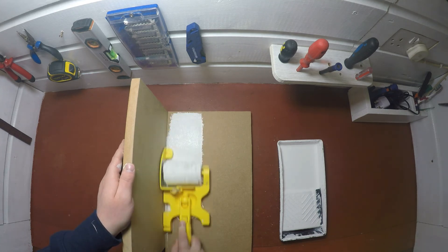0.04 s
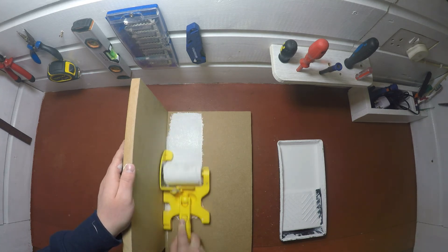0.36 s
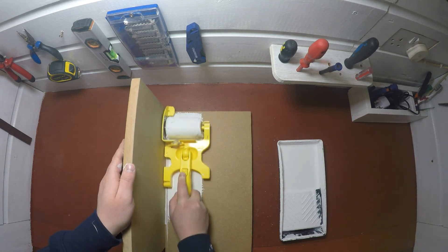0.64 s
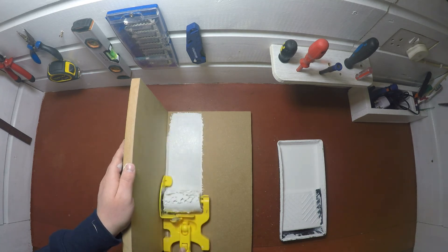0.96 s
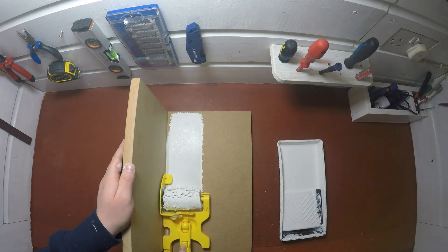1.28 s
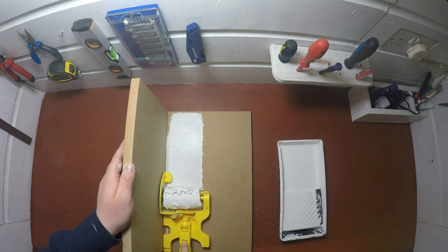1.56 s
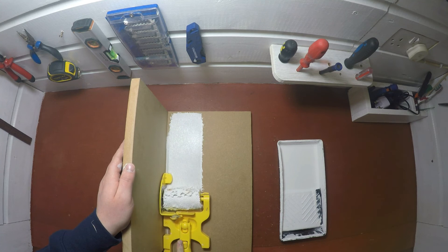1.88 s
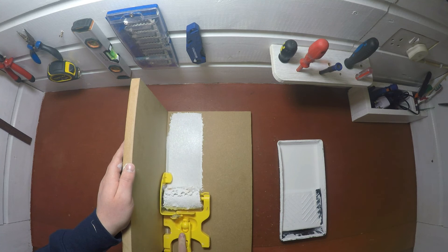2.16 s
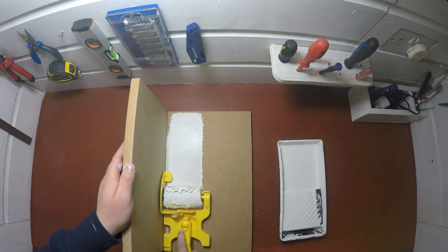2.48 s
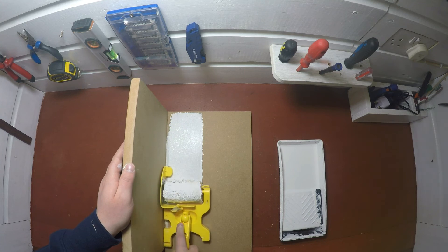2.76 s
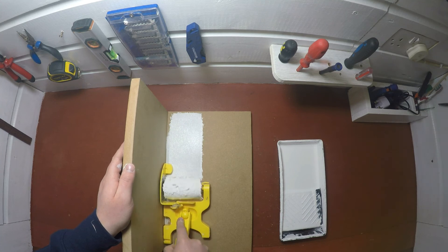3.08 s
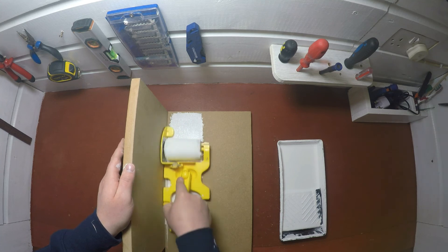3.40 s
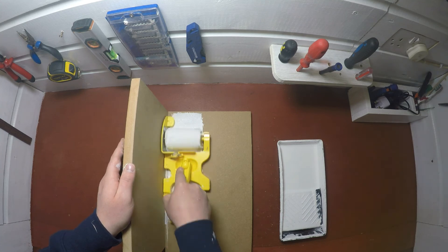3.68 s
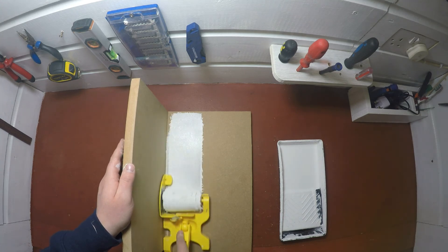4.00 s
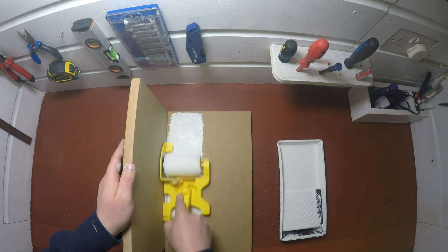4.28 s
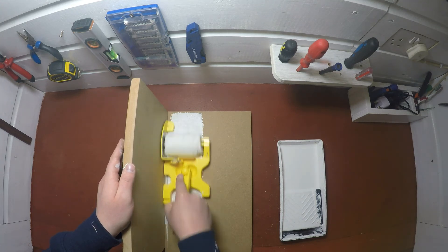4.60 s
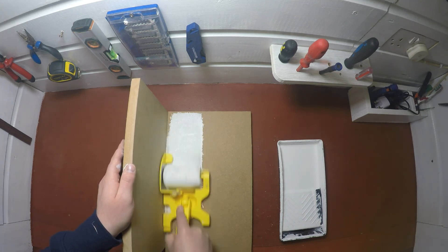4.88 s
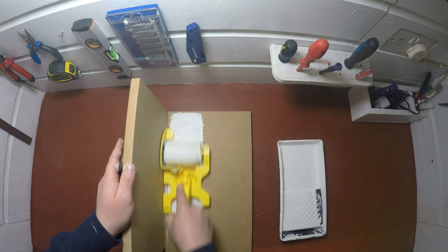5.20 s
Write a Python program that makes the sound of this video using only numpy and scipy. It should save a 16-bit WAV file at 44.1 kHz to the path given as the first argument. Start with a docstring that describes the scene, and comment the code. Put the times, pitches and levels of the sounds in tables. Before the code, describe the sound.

A small plastic paint roller runs over a board, close by, in a small, dry room. For the first second it makes three quick strokes: the nap rolls, the edge guide scrapes, wet paint crackles and the dry axle gives tiny squeaks, over a soft rumble from the workbench. From about 1.1 to 3.1 seconds the rolling nearly stops, leaving faint nudges, small plastic clicks and light knocks as the tool is handled. At about 2.4 seconds comes one hard snap with a low thump in the bench, then a softer bump near 2.8. Rolling resumes at about 3.1 seconds and continues to the end in around five strokes, growing slightly louder, with sticky crackle and occasional clicks. The guide chatters briefly and brightly around 4.4 seconds, and the axle squeaks again near 4.8. Faint room noise lies underneath.

```python
"""Paint roller on a workbench

A plastic roller with an edge guide runs back and forth over a board, close by, in a small, dry room.
Friction makes the guide scrape and the dry axle squeak; wet paint crackles off the nap, and the
rolling forces the bench to rumble. In a pause the frame is handled: small clicks, then one hard
snap whose impact thumps the bench."""
import sys
import numpy as np
from scipy import signal
from scipy.fft import rfft, irfft, next_fast_len
from scipy.io import wavfile
from scipy.ndimage import uniform_filter1d

SR = 44100
rng = np.random.default_rng(int(sys.argv[2]) if len(sys.argv) > 2 else 0)


def generate_wav(sig):
    """Save sig (samples, or channels by samples) to the path in sys.argv[1] as 16-bit PCM at SR."""
    pcm = np.round(np.clip(np.atleast_2d(sig).T, -1, 1) * 32767).astype(np.int16)
    wavfile.write(sys.argv[1], SR, pcm)


N = 231501
T = np.arange(N) / SR


# Passes and nudges of the roller:
# (start [s], fastest [s], end [s], tread level [dB], guide level [dB], paint level [dB])
STROKES = [(-.2, 0.132, 0.32, -38, -30.5, -45.5), (0.319, 0.501, 0.71, -36.5, -31, -42.5),
           (0.598, 0.872, 1.116, -39, -32, -46), (1.073, 1.18, 1.29, -65, -63.5, -65),
           (1.374, 1.493, 1.74, -61.5, -57, -63.5), (1.91, 2.04, 2.09, -64, -55.5, -69),
           (2.09, 2.15, 2.35, -56, -59, -68), (2.55, 2.739, 2.95, -58.5, -60, -60),
           (3.099, 3.426, 3.683, -41, -40.5, -47), (3.702, 3.888, 4.126, -39.5, -37, -46.5),
           (4.163, 4.437, 4.603, -36.5, -31.5, -45.5), (4.578, 4.773, 4.866, -35.5, -31.5, -41.5),
           (4.884, 5.029, 5.184, -34, -29.5, -42.5), (5.182, 5.285, 5.67, -35.5, -28.5, -43.5)]

def strokes():
    """Power laws: the amplitudes of tread, scrape and crackle each grow as a power of roller speed."""
    tread, guide, paint = undb([-73.5, -70, -73.5])  # roller at rest
    for start, fastest, end, tread_db, guide_db, paint_db in STROKES:
        progress = np.interp(T, [start, fastest, end], [0, .5, 1])
        speed = np.abs(np.sin(np.pi * progress))
        tread = np.hypot(tread, undb(tread_db) * speed ** 1.31)
        guide = np.hypot(guide, undb(guide_db) * speed ** 1.6)
        paint = np.hypot(paint, undb(paint_db) * speed ** .93)
    return tread, guide, paint


# Resonances of the board: (frequency [Hz], bandwidth [Hz], gain [dB])
BOARD_MODES = [(262, 37, 1), (319.4, 75, 7), (529, 34, 7), (603, 120, 9.5), (820, 260, 4), (1465, 78, 5),
               (1742, 89, 6.5), (2850, 98, -6.5), (3420, 110, 6), (3720, 77, 7.5), (4270, 230, 5),
               (5400, 300, 2.5)]
# Spectra of the nap's tread, the guide's scrape and the paint's crackle: (frequency [Hz], gain [dB])
TREAD_SPECTRUM = [(60, -25), (120, -3), (170, -2.5), (260, 2), (420, -1), (560, 0.5), (690, -7.5),
                  (850, -2), (1200, -9), (2200, -29), (8000, -60.5)]
SCRAPE_SPECTRUM = [(200, -35), (650, -19), (1050, -1.5), (1500, 3.5), (2200, -2.5), (3300, -5.5),
                   (4500, -13.5), (5600, -13), (6800, -20.5), (10000, -23.5), (15000, -31)]
PAINT_SPECTRUM = [(800, -14), (3000, 3.5), (6000, -1.5), (7500, -9), (9200, 0), (10600, -6.5), (12300, -3),
                  (15500, -16)]

def rolling(tread, guide, paint):
    """Shot noise: tiny impulses merge as the nap treads, the guide catches and paint threads snap."""
    spurts = walk(rate=50)
    contacts = grains(per_second=2500, spread_db=2.5) * undb(1.3 * spurts)
    catches = grains(per_second=3500, spread_db=0) * undb(2 * spurts)
    snaps = grains(per_second=4000, spread_db=-.5) * undb(2.85 * walk(rate=200))
    body = unit(colour(contacts, TREAD_SPECTRUM, BOARD_MODES))
    scrape = unit(colour(catches, SCRAPE_SPECTRUM, BOARD_MODES))
    crackle = unit(colour(snaps, PAINT_SPECTRUM))
    return tread * body + undb(.3) * guide * scrape + undb(-1.3) * paint * crackle


# Resonances of the plastic frame: (frequency [Hz], bandwidth [Hz], gain [dB])
FRAME_MODES = [(608, 13, 6.5), (1183, 76, 9), (1380, 70, 1.5), (1510, 79, 9), (2060, 43, -3),
               (2367, 120, 10), (3060, 330, 5), (3393, 140, 4.5), (4380, 180, 5), (5540, 420, 4.5),
               (6520, 270, 7.5), (9300, 390, 4)]
# Axle squeaks: (time [s], duration [s], start pitch [Hz], end pitch [Hz], relative level [dB],
# overtones re fundamental [dB], roughness [0-1])
SQUEAKS = [(0.041, 0.012, 952, 992, -29, -18, 0.7), (.093, 0.0084, 1780, 1758, -20.5, -5.5, 0.76),
           (0.122, 0.016, 1260, 952, -28, -24, 1), (0.141, .01, 1016, 1470, -25.5, -1.5, 0.9),
           (.15, 0.01, 1600, 1790, -19.5, -2, 0.46), (0.163, 0.019, 1861, 1882, -27, -5, 1),
           (0.706, .011, 826, 1046, -24, -11, 0.4), (0.78, 0.0071, 1000, 1150, -21.5, -7.5, 0.87),
           (0.816, 0.024, 920, 1174, -23.5, -14, 0.86), (0.827, 0.019, 1382, 1425, -13, -7.5, 0.35),
           (0.861, 0.033, 1475, 1486, -23, -23.5, 1), (0.894, 0.017, 916, 1063, -23.5, -1.5, 0.7),
           (4.748, 0.0354, 1793, 1768, -18.5, -3.5, 0.47), (4.779, 0.026, 1770, 1766, -22.5, 3, 0.37),
           (4.809, 0.016, 1768, 1816, -31.5, -1.5, 0.4), (4.831, 0.049, 1778, 1856, -38.5, -32, 0)]

def axle(attack_s=.0046, ring_t60=.035):
    """Stick-slip oscillation: the dry axle chirps; uneven slipping smears the harmonics and adds rasp."""
    out = np.zeros(N)
    wobble = walk(rate=1120)
    rasp_spectrum = [(500, -10), (1500, -7.5), (3300, 6.5), (6500, -4), (10000, -8), (15000, -16.5)]
    rasp = unit(colour(rng.standard_normal(N), rasp_spectrum, FRAME_MODES))
    for start, length, start_hz, end_hz, first_db, overtones_db, rough in SQUEAKS:
        second_db = first_db + overtones_db + 1.2
        third_db = first_db + overtones_db - .8
        t = T[:int((length + ring_t60) * SR)]
        now = slice(int(start * SR), int(start * SR) + len(t))
        hz = np.interp(t, [0, length], [start_hz, end_hz]) * (1 + .05 * rough * wobble[now])
        phase = 2 * np.pi * np.cumsum(hz) / SR
        tone = .95 * rough * undb(third_db) * rasp[now] * (1 + np.cos(phase))  # one noise burst per slip
        for k, db in enumerate([first_db, second_db, third_db, third_db - 13.5, third_db - 15.5], 1):
            smear = rough * min(k, 3) * .75 * walk(520, len(t))
            flutter = 1 + .7 * rough * walk(600, len(t))
            tone += undb(db) * np.sqrt(2) * np.sin(k * phase + smear) * flutter
        envelope = np.minimum(t / attack_s, 1) * fade(np.maximum(t - length, 0), ring_t60)
        add(out, start, tone * envelope)
    return out * undb(-2.5)


# Clicks of the frame: (time [s], relative level [dB], low band [dB], middle band [dB], top band [dB])
CLICKS = [(0.013, -18, -26, -3, -13.5), (0.972, -22.5, -16, -7, -13), (1.029, -18.5, -17, 0, -10.5),
          (1.037, -13.5, -22, -4.5, -17.5), (1.143, -31, -38.5, -6, -26), (1.372, -14, -27, -18.5, -15),
          (1.5, -30, -13, -7, -40), (1.563, -30.5, -18, -10, -44), (1.932, -32, -15.5, 1.5, -36),
          (1.942, -31, -13.5, -7, -51), (2.008, -33.5, -8, -1, -12), (2.114, -29.5, -24, -6, -8),
          (2.202, -31, -28, -6, -28), (2.297, -23.5, 2, -4.5, -19), (2.319, -9, -19.5, -11.5, -11.5),
          (2.434, 0.5, -15.5, -4, -16), (2.442, -11, -24, -15, -27), (3.26, -8.5, -15, 0.5, -10.5),
          (3.352, -18.5, -17, 15, -3), (4.122, -13.5, -6, -1, -12.5), (4.22, -12, -13, -10, -22),
          (4.937, -15.5, -8, 4, -28)]

def clicks(attack_s=.00025, crack_t60=.024, ring_t60=.084, ring_db=-5.5, lag_s=.0012):
    """Impulse response: a sharp crack, then the dense, quickly damped modes of the plastic frame."""
    out, t = np.zeros(N), T[:4096]
    envelope = np.minimum(t / attack_s, 1) * (fade(t, crack_t60) + undb(ring_db) * fade(t, ring_t60))
    for start, db, low, mid, top in CLICKS:
        spectrum = [(80, low - .5), (260, low + .5), (500, low), (800, low + 1),
                    (1300, mid - 5), (2100, mid - 6.5), (3400, -14.5), (5200, -16),
                    (7500, top - 10), (10000, top - 11), (15000, top - 25)]
        click = unit(colour(rng.standard_normal(len(t)) * envelope, spectrum, FRAME_MODES))
        add(out, start + lag_s, undb(db - 22.5) * click)
    return out


# Spells of chatter in the guide: (start [s], end [s], level at mid-spell [dB])
CHATTER = [(0.448, 0.573, -39.5), (3.3, 3.48, -47.5), (4.311, 4.545, -31.5), (4.958, 5.106, -40)]

def chatter(per_second=75, jitter=.28, centre_hz=5000, scatter_db=4):
    """Friction chatter: an uneven train of slips swells and fades; returns rows as in HIGH_RINGS."""
    rows = []
    for start, end, db in CHATTER:
        for k, (late, high, loud) in enumerate(rng.standard_normal((24, 3))):
            time = start + (k + .5 + jitter * late) / per_second
            if start < time < end:
                swell_db = 10 * np.log10(np.sin(np.pi * (time - start) / (end - start)))
                rows.append((time, centre_hz * (1 + .0486 * high), db + swell_db + scatter_db * loud))
    return rows


# Single slips of the guide, and the brief high ring of the frame's clicks in the pause:
# (time [s], centre frequency [Hz], level [dB])
HIGH_RINGS = [(0.086, 3470, -27), (.096, 3560, -27), (.471, 5240, -28.5), (.627, 3750, -32),
              (.642, 3330, -27.5), (.654, 3590, -25.5), (.682, 3450, -27), (1.045, 4810, -29),
              (1.502, 3050, -39.5), (2.042, 3060, -46), (2.204, 3750, -42.5), (2.284, 3020, -41.5),
              (2.337, 4190, -23.5), (3.434, 4790, -32.5), (4.098, 4970, -30), (4.372, 4880, -29),
              (4.4137, 4880, -26.5), (4.427, 4600, -21.5)]
# Octave above each ring: (centre frequency [Hz], relative level of the octave [dB])
RING_OCTAVE = [(3000, -24.5), (3550, -7), (4300, -31)]

def high_rings(width_hz=620, rise_s=.0021, hold_s=.004, t60=.028):
    """Transient excitation: a guide slip or frame click rings the plastic, too briefly for clear pitch."""
    out, t = np.zeros(N), T[:3000]
    envelope = np.minimum(t / rise_s, 1) * fade(np.maximum(t - hold_s, 0), t60)
    for start, hz, db in HIGH_RINGS + chatter():
        octave_db = np.interp(hz, *np.transpose(RING_OCTAVE))
        ring = noise_band(hz, width_hz, len(t))
        ring += undb(octave_db) * noise_band(2 * hz, 2 * width_hz, len(t))
        scratch = undb(-9.5) * noise_band(3600, 2800, len(t))
        add(out, start, undb(db) * envelope * (ring + scratch))
    return out


# Rubbed resonances: (start [s], end [s], frequency [Hz], bandwidth [Hz], level [dB])
RUBS = [(0.381, 0.625, 788, 70.4, -37), (.42, 0.584, 2820, 70, -38), (2.722, 2.82, 369, 69.2, -50.5),
        (3.749, 4.078, 1780, 190, -42.5), (4.076, 4.136, 1101, 900, -38), (4.619, 4.785, 1800, 188, -40),
        (4.96, 5.163, 1481, 100, -41)]

def rubs():
    """Resonance: light friction drives one mode of the tool or board, which swells and dies away."""
    out = np.zeros(N)
    for start, end, hz, width_hz, db in RUBS:
        swell = signal.windows.tukey(int((end - start) * SR), .7)
        add(out, start, undb(db) * swell * noise_band(hz, width_hz, len(swell)))
    return out


def bubble_pops(paint, per_second=34, peak_db=-33, scatter_db=.5, onset_db=-60, full_paint_db=-42):
    """Poisson process: paint bubbles burst in bright ticks, fewer and softer when the roller is slow."""
    out, t = np.zeros(N), T[:1500]
    spectrum = [(1000, -27.5), (4000, -11.5), (9000, -.5), (12500, -5.5), (15500, -.5)]
    rate = per_second * np.minimum(paint / undb(onset_db), 1) ** 4
    for i in np.flatnonzero(rng.random(N) < rate / SR):
        tick = colour(rng.standard_normal(len(t)) * fade(t, t60=.0063), spectrum)
        strength = (paint[i] / undb(full_paint_db)) ** .38
        peak = strength * undb(peak_db - scatter_db * rng.standard_normal())
        add(out, T[i], peak * tick / np.abs(tick).max())
    return out


# Modes of the bench top: (frequency [Hz], relative level [dB], decay time T60 [s])
BENCH_MODES = [(65.1, -2, 0.3), (71.4, -1, 0.13), (121, -19, 0.25), (241, -7, 0.1), (366, -7.5, .11)]
# Knocks that reach the bench: (time [s], peak level [dB], contact time [s])
THUMPS = [(.155, -22.5, 0.0054), (1.075, -30.5, .004), (1.566, -35, 0.0053), (2.01, -35, .004),
          (2.335, -25, 0.0044), (2.447, -10, 0.0021), (2.757, -22, 0.0038), (3.441, -24, 0.0041),
          (4.229, -27, 0.0018), (4.931, -23.5, 0.0028), (5.095, -21.5, 0.0027)]
# Spectrum of the bench's rumble: (frequency [Hz], gain [dB])
RUMBLE_SPECTRUM = [(15, -37), (30, -21.5), (45, -3.5), (58, 5), (76, -4.5), (95, -15), (125, -13),
                   (170, -35.5), (400, -67.5)]

def bench(tread, rumble_db=-33, full_tread_db=-37.5, smoothing_s=.16):
    """Free and forced vibration: the bench top rings after each knock and rumbles under the rolling."""
    out, t = np.zeros(N), T[:16384]
    ring = sum(undb(db) * np.sin(2 * np.pi * hz * t) * fade(t, t60) for hz, db, t60 in BENCH_MODES)
    for start, db, contact_s in THUMPS:
        force = np.sin(np.pi * np.minimum(t / contact_s, 1))
        boom = signal.fftconvolve(ring, force)[:len(t)]
        add(out, start, -undb(db) * boom / np.abs(boom).max())
    drive = (uniform_filter1d(tread, int(smoothing_s * SR)) / undb(full_tread_db)) ** .52
    rumble = unit(colour(rng.standard_normal(N), RUMBLE_SPECTRUM))
    return out + undb(rumble_db) * drive * rumble


def room(x, t60=.13, wet_db=-9.5, first_echo_s=.004):
    """Reverberation: reflections from near walls add a short, slightly dull tail to the direct sound."""
    t = T[:12000]
    echoes = rng.standard_normal(len(t)) * fade(t, t60) * (t > first_echo_s)
    tail = colour(echoes, [(200, 11), (4000, -4), (8000, -5.5), (15000, -.5)])
    tail /= np.sqrt(np.sum(tail ** 2))
    return x + undb(wet_db) * signal.fftconvolve(x, tail)[:N]


# Spectrum of the room's ambient noise: (frequency [Hz], gain [dB])
AMBIENT_SPECTRUM = [(15, -22), (25, -0.5), (64, -11.5), (148, -27.5), (204, -8), (233, -30), (648, -35.5),
                    (703, -34), (762, -34.5), (826, -33.5), (6920, -41), (15500, -64.5)]

def background(noise_db=-55.5, hum_hz=211, hum_db=-65.5):
    """Noise floor: stationary room noise and a faint hum that wavers by phase modulation."""
    hum = np.sqrt(2) * np.sin(2 * np.pi * hum_hz * T + .4 * walk(rate=6))
    noise = unit(colour(rng.standard_normal(N), AMBIENT_SPECTRUM))
    return undb(noise_db) * noise + undb(hum_db) * hum


def undb(db):
    """Decibels to amplitude ratio."""
    return 10 ** (np.asarray(db) / 20)


def unit(x):
    """Normalisation to an rms of one."""
    return x / np.sqrt(np.mean(x ** 2) + 1e-18)


def add(out, start_s, x):
    """Superposition of a sound at its start time."""
    i = max(int(start_s * SR), 0)
    out[i:i + len(x)] += x[:max(N - i, 0)]


def fade(t, t60):
    """Exponential decay, 60 dB in t60 seconds."""
    return np.exp(-np.log(1000) * t / t60)


def colour(x, spectrum, resonances=()):
    """Minimum-phase filter: a smooth spectrum with resonance peaks and dips on it."""
    size = 2 * next_fast_len(len(x) // 2 + 1024)
    f = np.arange(size // 2 + 1) * SR / size
    hz, db = np.transpose(spectrum)
    gain_db = np.interp(np.log(f + 1), np.log(hz), db)
    for centre, width, lift in resonances:
        gain_db += lift / (1 + (2 * (f - centre) / width) ** 2)
    cepstrum = irfft(np.log(undb(gain_db)))
    cepstrum[1:size // 2] *= 2  # folding onto positive time makes the filter causal
    cepstrum[size // 2 + 1:] = 0
    return irfft(rfft(x, size) * np.exp(rfft(cepstrum)))[:len(x)]


def walk(rate, size=N):
    """Low-pass noise: smooth random wandering with an rms of one."""
    span = max(int(SR / rate), 1)
    return unit(uniform_filter1d(uniform_filter1d(rng.standard_normal(size), span), span))


def grains(per_second, spread_db):
    """Poisson impulses of random sign, their levels spread exponentially in decibels."""
    happens = rng.random(N) < per_second / SR
    sizes = undb(spread_db * np.minimum(rng.exponential(size=N), 4))
    return happens * sizes * np.sign(rng.standard_normal(N))


def noise_band(hz, width_hz, size):
    """Narrow-band noise: a randomly driven resonance with an rms of one."""
    phase = 2 * np.pi * hz * T[:size]
    return walk(2.1 * width_hz, size) * np.sin(phase) + walk(1.37 * width_hz, size) * np.cos(phase)


def scene():
    """Superposition: the roller with its reverberation, the bench and the noise floor in one channel."""
    tread, guide, paint = strokes()
    low = bench(tread) + background()
    roller = rolling(tread, guide, paint) + axle() + rubs() + clicks() + high_rings() + bubble_pops(paint)
    return (room(roller) + low)[None]


def record(dry):
    """Band limiting and clipping: the deepest bass is cut, then the peaks, then the highest treble."""
    high_pass = signal.butter(2, 35, "high", fs=SR, output="sos")
    low_pass = signal.ellip(10, .2, 80, 15450, fs=SR, output="sos")
    clipped = np.clip(signal.sosfilt(high_pass, dry), -.9, .9)
    return signal.sosfilt(low_pass, clipped)


dry = scene()
out = record(dry)
generate_wav(out)
```